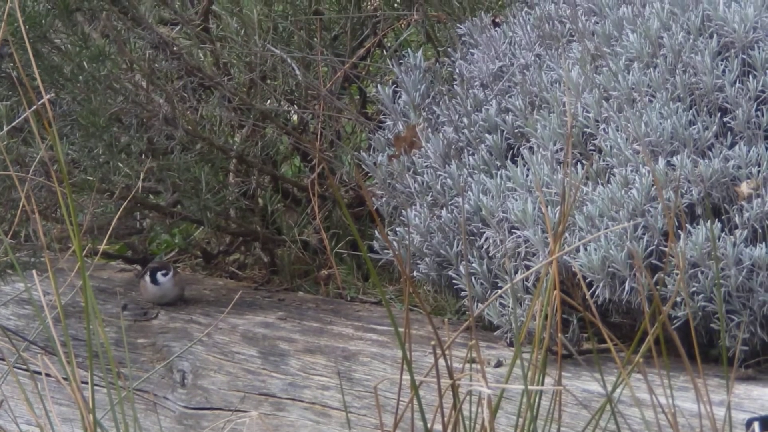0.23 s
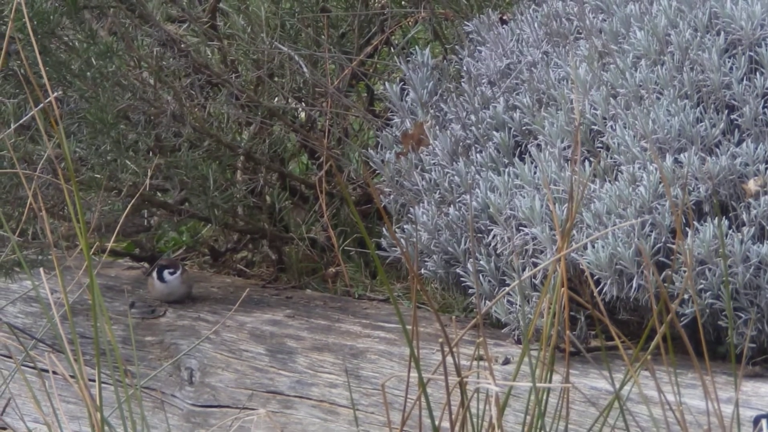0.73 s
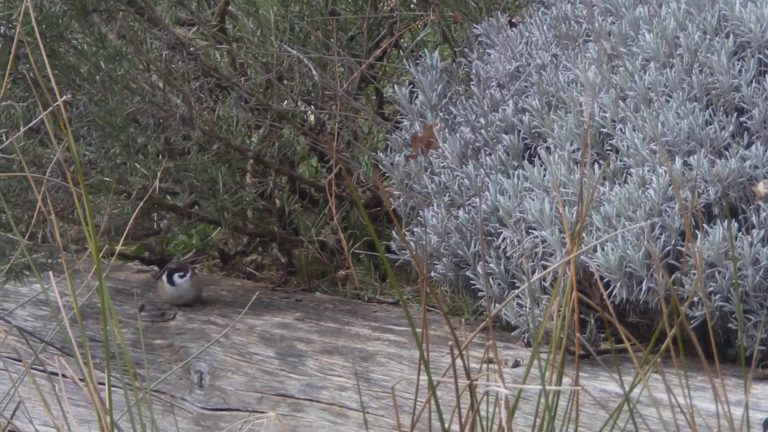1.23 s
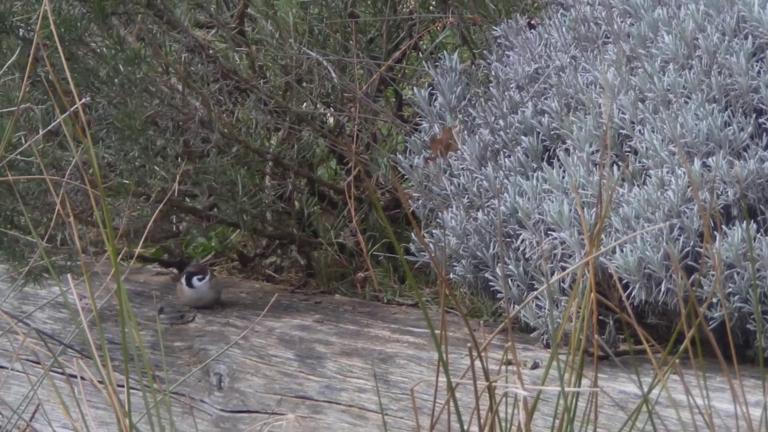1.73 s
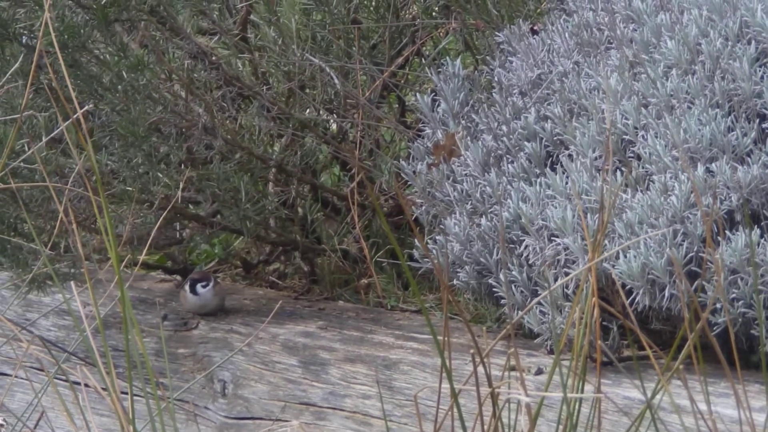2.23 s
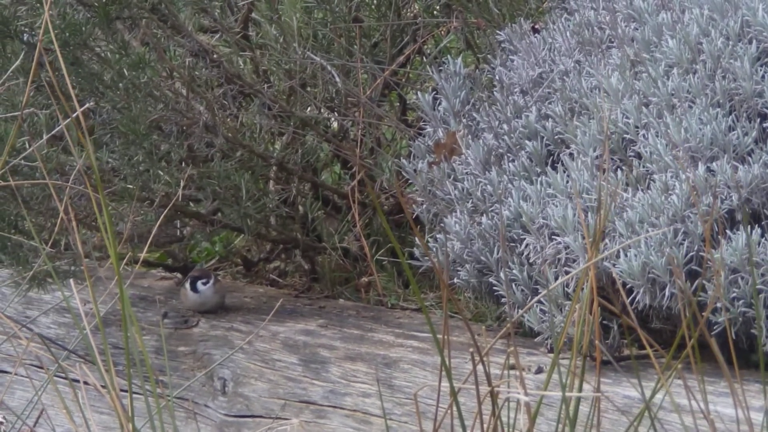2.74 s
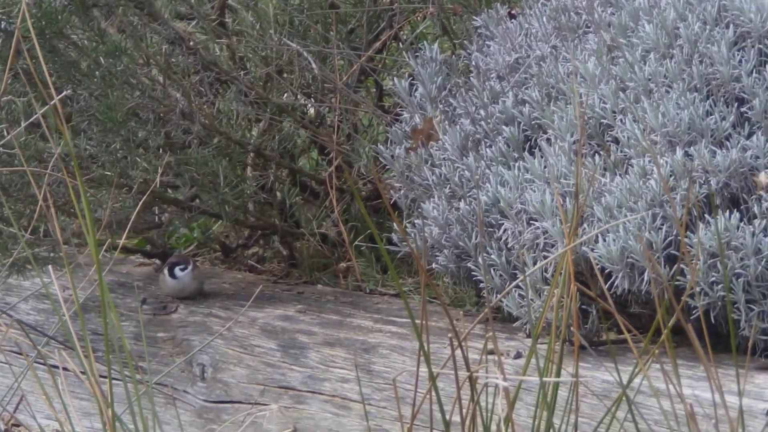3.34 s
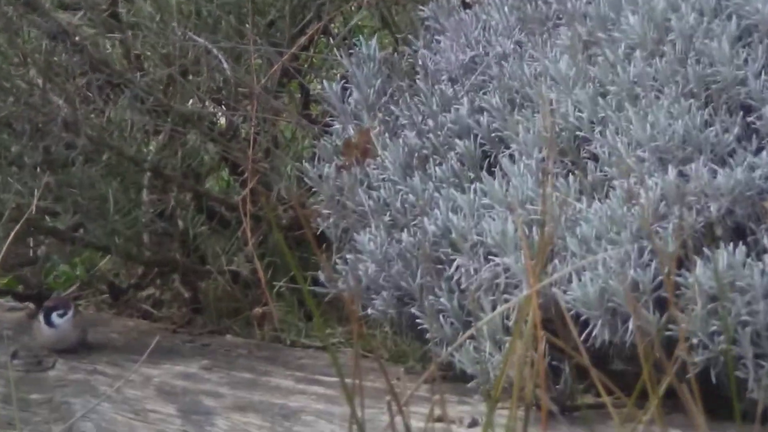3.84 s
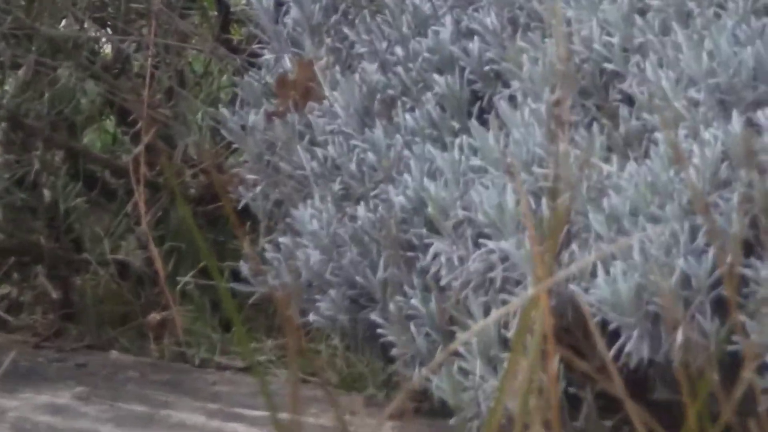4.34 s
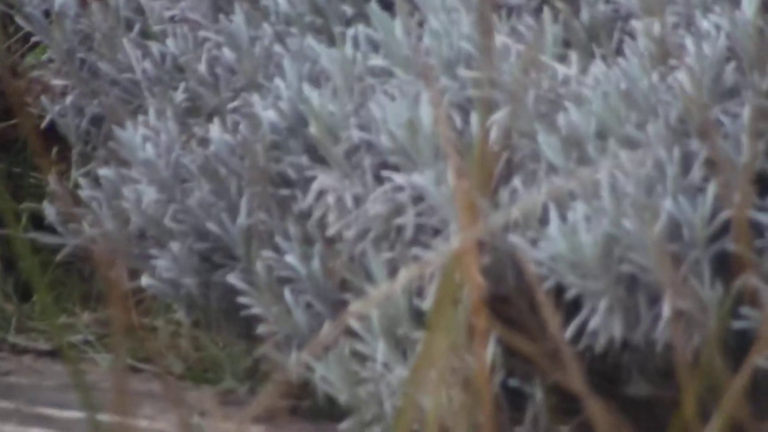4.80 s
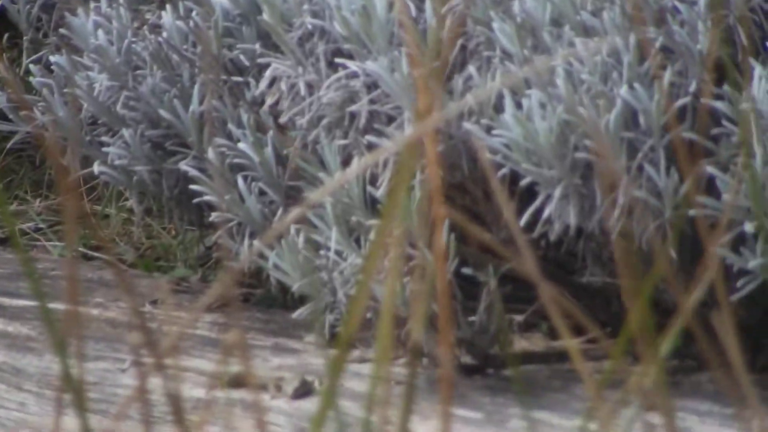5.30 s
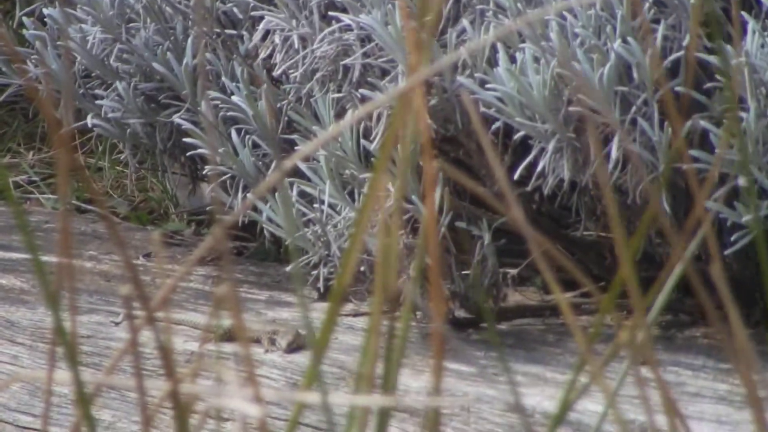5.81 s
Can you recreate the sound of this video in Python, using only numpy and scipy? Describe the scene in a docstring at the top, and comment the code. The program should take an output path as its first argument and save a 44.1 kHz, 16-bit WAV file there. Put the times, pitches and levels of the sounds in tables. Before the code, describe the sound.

Distant road drone over a quiet garden with light hiss; midway, handling clicks, thumps and rubs, a muffled zoom stretch, then small knocks and clear again.

```python
"""Far traffic over a garden

Distant traffic drones as shaped noise and a wandering engine tone, with a low moan and a light breeze.
The hand-held camera whirs faintly: noise through the resonances of its housing, with a hum and hiss.
Close to the microphone a button clicks and a finger knocks and rubs on the case: ringing modes and noise.
While the zoom lever is held the sound turns duller and quieter and a thin motor hiss shows.
A small bird chips faintly in short gliding sines; a few faint dry ticks are perhaps twigs or birds.
"""
import sys
import numpy as np
from scipy import signal
from scipy.fft import rfft, irfft
from scipy.io import wavfile
from scipy.ndimage import uniform_filter1d

SR = 44100
rng = np.random.default_rng(int(sys.argv[2]) if len(sys.argv) > 2 else 0)


def dump(signal):
    """Clip the signal to [-1, 1] and save it as 16-bit WAV at the path in sys.argv[1]."""
    limited = np.clip(np.atleast_2d(signal).T, -1, 1)
    pcm = np.round(limited * 32767).astype(np.int16)
    wavfile.write(sys.argv[1], SR, pcm)


N = 267246
TIME, HZ = np.arange(N) / SR, np.fft.rfftfreq(N, 1 / SR)

# zoom lever held: t/s, amount (0-1)
ZOOM_HELD = [(3.605, 0.1), (3.628, 0.8), (3.65, 1), (5.03, 1), (5.09, .5), (5.2, 0)]


def amp(db):
    """Decibels to gain."""
    return 10 ** (np.asarray(db) / 20)


def unit(x):
    """Scales to rms 1."""
    return x / np.sqrt(np.mean(x ** 2) + 1e-20)


def curve(rows):
    """Joins (s, value) rows by straight lines."""
    return np.interp(TIME, *np.transpose(rows))


def arch(s, length):
    """A smooth rise and fall, 0-1, with its top at time s."""
    return np.cos(np.pi * np.clip((TIME - s) / length, -.5, .5)) ** 2


def colour(points):
    """Gain over frequency from (Hz, dB) points, joined on a log frequency axis."""
    hz, db = np.transpose(points)
    return amp(np.interp(np.log(HZ + 1), np.log(hz + 1), db))


def noise(gain):
    """Noise of rms 1 with the given gain over frequency."""
    real, imag = rng.standard_normal((2, len(HZ)))
    return unit(irfft((real + 1j * imag) * gain, N))


def drift(rate):
    """Slow chance of rms 1, up to about rate changes a second."""
    return noise(np.exp(-(HZ / rate) ** 2))


def narrow(hz, width):
    """A narrow band of noise of rms 1 whose centre follows hz."""
    slow_noise = noise(1 / (1 + (1.3 * HZ / width) ** 2))
    carrier = np.cos(2 * np.pi * np.cumsum(hz) / SR)
    return unit(slow_noise * carrier)


def band(x, hz, octaves, skirt_db):
    """Keeps a bell-shaped band around hz, over a weak broad skirt; rms 1."""
    f = np.fft.rfftfreq(len(x), 1 / SR) + 1  # +1 avoids log of zero
    bell = np.exp(-.5 * (np.log2(f / hz) / octaves) ** 2)
    skirt = amp(skirt_db) * f / (f + hz) / np.sqrt(1 + (f / (4 * hz)) ** 4)
    return unit(irfft(rfft(x) * (bell + skirt), len(x)))


def add(mix, s, sound):
    """Mixes a sound in at time s."""
    part = mix[round(s * SR):][:len(sound)]
    part += sound[:len(part)]


def traffic():
    """Dull far tyre rumble, narrow drones and one wandering engine, swelling together."""
    # rumble colour: f/Hz, relative level/dB
    rumble_colour = [(20, -27), (45, -20), (70, -12.5), (92, -6), (120, -10), (175, -5), (220, -11.5),
                     (320, -16.5), (410, -20.5), (490, -18.5), (530, -27.5), (800, -29), (1200, -38),
                     (6000, -62)]
    # engine drones, before the common swell: f/Hz, width/Hz, level/dB rms
    drone_rows = [(143.5, 8.3, -47), (162.4, 16, -43.8), (197, 8, -49), (240, 11, -57), (283.8, 9, -51),
                  (321.6, 13.7, -52.5), (361, 12.5, -57.5), (543, 9, -66.5)]
    # common slow swell: t/s, gain/dB
    level_rows = [(0, -0.3), (1.2, -0.8), (2.3, 0.5), (3.1, 0.7), (4.8, -2), (5.1, -1.2), (5.3, .3),
                  (6.06, 0)]
    # brief surges: t/s at the top, length/s, lift/dB
    surge_rows = [(1.607, 0.25, 4), (3.2, .25, 2), (3.78, 0.28, 1.5), (5.326, .25, 1.5), (6.0, 0.26, 1)]

    rumble = amp(-41 + 0.94 * drift(2.8)) * noise(colour(rumble_colour))

    bells = [amp(db) * unit(1 / (1 + (1.3 * (HZ - hz) / width) ** 2)) for hz, width, db in drone_rows]
    power = sum(bell ** 2 for bell in bells)
    drones = np.sqrt(power.mean()) * noise(np.sqrt(power))

    # nearest engine: its pitch wanders, and the octave above goes with it
    engine_hz, wander_share, flutter_db = 143.55, .012, 2
    pitch_db, octave_db = -44.5, -55
    turn = 2 * np.pi * np.cumsum(engine_hz * (1 + wander_share * drift(7.99))) / SR
    engine = np.zeros(N)
    for k, db in enumerate([pitch_db, octave_db], 1):
        engine += amp(db + flutter_db * drift(9)) * unit(np.sin(k * turn))

    surges_db = sum(db * arch(s, length) for s, length, db in surge_rows)
    return (rumble + drones + engine) * amp(curve(level_rows) + surges_db)


def swells():
    """Single narrow bands of the far rumble rise and sink for a moment."""
    # t/s at the top, length/s, level/dB rms at the top, f/Hz
    swell_rows = [(4.29, 0.18, -44.5, 260), (4.39, .14, -44, 255), (4.68, .24, -42, 295),
                  (4.72, 0.28, -55.5, 775), (3.68, 0.57, -44.5, 95)]
    width_hz = 45
    out = np.zeros(N)
    for s, length, db, hz in swell_rows:
        out += amp(db) * arch(s, length) * narrow(np.full(N, hz), width_hz)
    return out


def moan():
    """A breathy low tone, a narrow band of noise, swells, then sinks in pitch as it fades."""
    # t/s, f/Hz, level/dB rms
    moan_path = [(2.5, 470, -59), (3.1, 470, -54), (3.3, 455.2, -48.5), (3.52, 455.5, -44.5),
                 (3.66, 430, -47.5), (3.82, 422, -47), (3.95, 420, -55), (4.3, 422, -72)]
    width_hz = 55
    s, hz, db = np.transpose(moan_path)
    level = amp(np.interp(TIME, s, db, left=-100))
    return level * narrow(np.interp(TIME, s, hz), width_hz)


def contacts(rows, modes, snap_db, top_hz):
    """Each contact snaps and rings one set of modes; a harder one sounds brighter."""
    snap_t60_s, rise_s = 0.0085, 0.00025
    # hardness tilts the spectrum about the pivot; the tilt flattens out below the knee
    pivot_hz, knee_hz = 2400, 1200
    out, t = np.zeros(N), np.arange(2048) / SR
    f = np.fft.rfftfreq(len(t), 1 / SR)
    octaves = np.log2(np.hypot(f, knee_hz) / pivot_hz)
    top = 1 / np.sqrt(1 + (f / top_hz) ** 10)  # steep low-pass
    for s, db, hardness in rows:
        ring = np.zeros(len(t))
        for hz, mode_db, t60 in modes:
            ring += amp(mode_db - 60 * t / t60) * np.sin(2 * np.pi * (hz * t + rng.random()))
        snap = amp(snap_db - 60 * t / snap_t60_s) * rng.standard_normal(len(t))
        contact = (ring + snap) * (1 - np.exp(-t / rise_s))
        tick = irfft(rfft(contact) * top * amp(hardness * octaves))[:len(t) // 2]
        # the whole energy counts as if spread over 1.9 ms
        add(out, s, amp(db) * tick / np.sqrt(np.sum(tick ** 2) / (0.0019 * SR)))
    return out


def clicks_and_knocks():
    """Bright clicks and faint ticks ring high; the case rings duller under finger and lever."""
    # bright clicks: a small button, and three faint dry ticks earlier, perhaps twigs or birds;
    # one more faint tick comes late: t/s, level/dB rms over 1.9 ms, hardness/dB per octave
    bright_rows = [(.7444, -55.5, 9), (1.0474, -53, 10), (2.7894, -55, 8), (3.1284, -30.8, 1.5),
                   (3.2281, -35, -5.5), (5.1125, -53.5, 4)]
    # the high ring they all share: f/Hz, relative level/dB, t60/s
    bright_modes = [(1210, -7, 0.021), (2410, -5, .014), (3050, -12, .012), (3750, -14, .01),
                    (4780, -2, 0.0081), (5430, -8, .007), (7100, -12, .008), (8200, -3, .007),
                    (8665, -2, 0.0082), (9900, -6, .006), (11900, -12, .006)]
    # knocks on the case: t/s, level/dB rms over 1.9 ms, hardness/dB per octave
    knock_rows = [(3.3660, -36, 5), (3.3676, -26.5, -1.5), (3.4728, -34, 6.5), (3.4776, -40, 4),
                  (3.4828, -38.5, 5), (3.5522, -34.5, 0), (3.5615, -44, 5), (3.5735, -47, -2),
                  (3.5933, -36, -3), (3.6045, -45, 1), (3.6185, -36.5, -2), (3.6208, -42, 0),
                  (5.0844, -43, 5), (5.1577, -41.5, 7), (5.1736, -39.5, 5), (5.1872, -39.5, 0),
                  (5.1965, -45, -1)]
    # what the case rings with: f/Hz, relative level/dB, t60/s
    case_modes = [(300, -4, .025), (484, -6, .03), (853, -3, 0.031), (1143, -1.5, 0.029), (1427, -2, .026),
                  (1750, -10, .016), (2380, 2.5, 0.019), (2930, 1, .015), (3250, -4, 0.013),
                  (3680, -8, .013), (4680, -7, .011), (5450, -18, .009)]
    bright = contacts(bright_rows, bright_modes, snap_db=-6, top_hz=12000)
    knocks = contacts(knock_rows, case_modes, snap_db=-11, top_hz=14000)
    return bright + knocks


def hand():
    """Short dull thumps of the hand on the body over the low creak of a shifting grip."""
    # grip creak: t/s, level/dB rms
    grip_level = [(2.4, -61), (3.13, -49), (3.22, -44), (3.38, -45), (3.5, -45.5), (3.62, -50), (3.8, -55),
                  (4.1, -70)]
    # creak colour: f/Hz, relative level/dB
    grip_colour = [(80, -30), (200, 0.5), (300, -2), (370, -7), (440, -3), (490, -0.5), (530, -7),
                   (590, -15), (1200, -35), (5000, -70)]
    # thumps: t/s at the start, level/dB rms at the top, centre f/Hz
    thump_rows = [(3.205, -38, 240), (3.226, -33, 240), (3.364, -32, 300), (3.393, -30.5, 150),
                  (3.437, -40, 400), (3.471, -34.5, 310), (3.553, -38, 400), (3.575, -36, 100),
                  (3.591, -36.5, 270)]
    rise_s = 0.0039
    out = amp(curve(grip_level)) * noise(colour(grip_colour))
    t = np.arange(2048) / SR
    push = t / rise_s * np.exp(1 - t / rise_s)  # peaks at 1
    for s, db, hz in thump_rows:
        thud = push * band(rng.standard_normal(len(t)), hz, octaves=0.41, skirt_db=-35)
        add(out, s, amp(db) * unit(thud) * np.sqrt(np.mean(push ** 2)))
    return out


def scrapes():
    """The dry fingertip catches in many tiny slips, which ring the case and fizz above it."""
    # strokes: t/s, length/s, level/dB rms, rasp/dB and fizz/dB against the body
    scrape_rows = [(3.404, 0.037, -48, -12, -10), (3.473, 0.029, -44, -23, -17), (3.56, .02, -60, 3, -18),
                   (3.593, .031, -52.5, -8, -13)]
    # colours of the three layers: f/Hz, relative level/dB
    body_colour = [(500, -23), (2000, -15), (2450, 2), (2680, -4), (2870, 0), (3250, -8), (3550, -5),
                   (3780, 2), (4150, -12), (4500, -8), (5200, -10), (6400, -21), (7500, -30), (16000, -50)]
    rasp_colour = [(3500, -35), (4900, -7), (5500, 0), (6000, -5), (6900, -25), (9000, -45)]
    fizz_colour = [(4000, -30), (7500, -5), (9200, 2), (12000, 0), (14300, -1), (15200, -10)]
    slips_per_s, spread_db = 1800, 2
    slide = 0.56  # smooth sliding noise, against slips of rms 1
    slip_now = rng.random(N) < slips_per_s / SR
    slips = slip_now * rng.choice([-1, 1], N) * amp(spread_db * rng.standard_normal(N))
    drive = rfft(unit(slips) + slide * rng.standard_normal(N))
    colours = (body_colour, rasp_colour, fizz_colour)
    layers = np.array([unit(irfft(drive * colour(points), N)) for points in colours])
    out = np.zeros(N)
    for s, length, db, rasp_db, fizz_db in scrape_rows:
        u = np.linspace(0, 1, int(length * SR))
        grains = amp([0, rasp_db, fizz_db]) @ layers[:, round(s * SR):][:, :len(u)]
        stroke = u ** .4 * (1 - u) ** 0.77
        add(out, s, amp(db) * unit(stroke * grains))
    return out


def rubs():
    """Skin sticks and slips softly: uneven grains under a stroke that starts fast and fades."""
    # t/s, length/s, level/dB rms, centre f/Hz, width/octaves
    rub_rows = [(0, .14, -56.5, 2900, .1), (.83, .1, -59, 1650, .08), (1.62, .1, -55.5, 1400, .5),
                (1.672, .028, -52, 1380, .2), (3.452, .016, -48, 1200, .25), (3.556, .03, -52, 900, .5),
                (5.062, .04, -56, 2200, 1), (5.168, .03, -55.5, 1200, .4)]
    out = np.zeros(N)
    for s, length, db, hz, octaves in rub_rows:
        u = np.linspace(0, 1, int(length * SR))
        slips = (rng.standard_normal(N) * amp(3.7 * drift(300)))[:len(u)]
        stroke = unit(u ** 0.37 * (1 - u) ** 0.87)
        add(out, s, amp(db) * stroke * band(slips, hz, octaves, skirt_db=-22))
    return out


def patchy(x):
    """Lets small patches of time and frequency swell and fade."""
    depth_db, patch_s, patch_hz = 1.6, .09, 130
    size, hop = 1024, 256
    z = signal.stft(x, nperseg=size, noverlap=size - hop)[2]
    field = rng.standard_normal(z.shape)
    field = uniform_filter1d(field, max(1, round(patch_hz * size / SR)), axis=0)
    field = uniform_filter1d(field, max(1, round(patch_s * SR / hop)), axis=1)
    wavering = z * amp(depth_db * unit(field))
    return unit(signal.istft(wavering, nperseg=size, noverlap=size - hop)[1][:N])


def camera():
    """A fine whir rings the housing, with a thin hum and the microphone's hiss."""
    # whir colour ahead of the housing: f/Hz, relative level/dB
    whir_colour = [(300, -10), (700, -2), (1130, -7), (1450, -6), (2000, -4), (2550, -1.5), (3000, -7),
                   (4000, -14), (4800, -12), (6400, -17), (7700, -28), (8700, -22), (11000, -35),
                   (16000, -40)]
    # resonances of the housing: f/Hz, width/Hz, lift/dB
    housing_modes = [(717, 31, 7), (754.4, 35, 8), (913, 30, 6), (999.3, 69, 15.5), (1060, 13, 4.5),
                     (1220, 60, 5.5), (1285, 35, 2.5), (1440, 50, 2), (1558, 56, 9.5), (1656, 53, 9),
                     (1727, 30, 4), (1865, 32, 2.5), (1960, 45, 5.5), (2025, 35, 4), (2145, 58, 7.5),
                     (2230, 35, 5), (2330, 32, 5), (2430, 40, 2), (2550, 40, 2), (2660, 60, 2.5),
                     (2874, 30, 0.5), (3080, 80, 2), (3283, 35, 3), (3624, 88, 5), (3720, 50, 2.5),
                     (4470, 200, 4), (4770, 200, 2.5), (5970, 90, 3), (6260, 130, 4)]
    # steady tones: f/Hz, level/dB rms ahead of a slight flutter
    hum_rows = [(399.6, -56), (1001, -70.5)]
    # microphone hiss colour: f/Hz, relative level/dB
    hiss_colour = [(1000, -2), (7700, -3), (10000, -1), (14400, 0.5), (14850, -5), (15000, -19),
                   (15150, -7), (15500, 1), (16000, 0)]
    lift_db = sum(db / (1 + (2 * (HZ - hz) / width) ** 2) for hz, width, db in housing_modes)
    whir = amp(-48.9 + 0.44 * drift(25)) * patchy(noise(colour(whir_colour) * amp(lift_db)))
    hum = np.zeros(N)
    for hz, db in hum_rows:
        tone = np.sin(2 * np.pi * hz * TIME + .2 * drift(2.8))
        hum += amp(db + 1.2 * drift(3.5)) * unit(tone)
    hiss = amp(-63) * noise(colour(hiss_colour))
    return whir + hum + hiss


def zoom_motor(hz=11600, width=700, db=-70):
    """A thin high band of motor hiss while the lens travels."""
    return amp(db) * curve(ZOOM_HELD) * noise(1 / (1 + ((HZ - hz) / width * 1.4) ** 2))


def air():
    """A fluttering breeze buffets the microphone as low noise, with a few soft gusts."""
    # gusts: t/s at the top, length/s, level/dB rms at the top, on top of the breeze
    gust_rows = [(.5, 0.18, -43), (2.02, .15, -48), (4.84, 0.17, -46), (5.158, .14, -41.5),
                 (5.32, 0.17, -39), (5.6, 0.58, -44), (6.02, .25, -48)]
    # buffeting colour: f/Hz, relative level/dB
    buffet_colour = [(10, -12), (28, 1), (60, 0.5), (85, -4), (130, -17), (400, -51)]
    breeze_db, flutter_db, flutters_per_s = -51.5, 2.5, 5.5
    breeze = amp(breeze_db + flutter_db * drift(flutters_per_s))
    gusts = sum(amp(db) * arch(s, length) for s, length, db in gust_rows)
    return (breeze + gusts) * noise(colour(buffet_colour))


def bird():
    """A small bird chips in very short gliding whistles."""
    # t/s, length/s, start f/Hz, end f/Hz, peak level/dB
    chip_rows = [(.3305, .005, 2450, 2650, -40), (1.378, 0.0046, 3500, 3150, -49),
                 (2.1342, .0042, 3550, 2850, -39.5)]
    out = np.zeros(N)
    for s, length, start_hz, end_hz, db in chip_rows:
        hz = np.linspace(start_hz, end_hz, int(length * SR))
        whistle = np.sin(2 * np.pi * np.cumsum(hz) / SR)
        add(out, s, amp(db) * np.hanning(len(hz)) * whistle)
    return out


def scene():
    """Everything meets at one microphone."""
    far = traffic() + swells() + moan()
    close = clicks_and_knocks() + hand() + scrapes() + rubs()
    mix = far + close + camera() + zoom_motor() + air() + bird()
    return mix[None]


def record(dry):
    """A muffling filter fades in while the zoom lever is held; then the band limit."""
    # muffling while the lens travels: f/Hz, gain/dB
    muffle_colour = [(60, -3), (100, -1.5), (150, -7.5), (260, -6), (350, -7.5), (450, -5), (700, -5),
                     (1300, -4.5), (1700, -9.5), (2270, -21.5), (2650, -10.5), (4200, -6), (6500, -13),
                     (8700, -17), (11500, -5)]
    edge_hz = 15830
    held = np.clip(curve(ZOOM_HELD), 0, 1)
    muffled = irfft(rfft(dry) * colour(muffle_colour), N)
    sound = (1 - held) * dry + held * muffled
    low_pass = signal.firwin(1023, edge_hz, window=("kaiser", 9), fs=SR)
    return signal.oaconvolve(sound, low_pass[None], "same")


dry = scene()
out = record(dry)
dump(out)
```